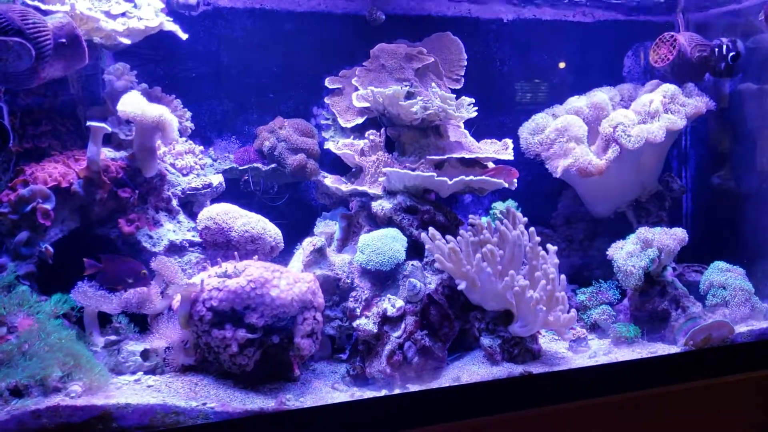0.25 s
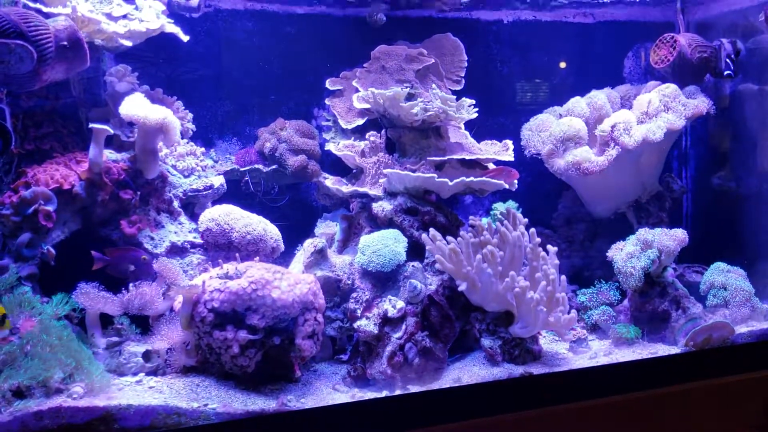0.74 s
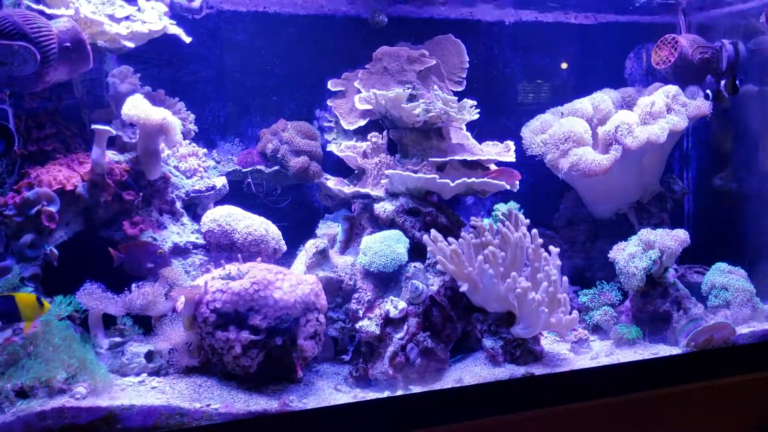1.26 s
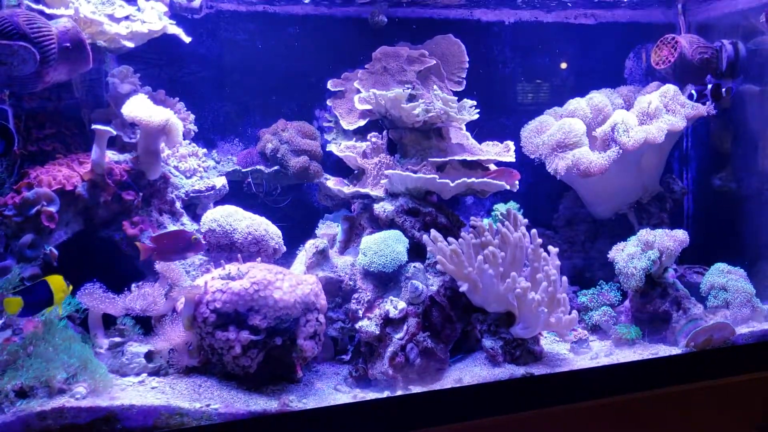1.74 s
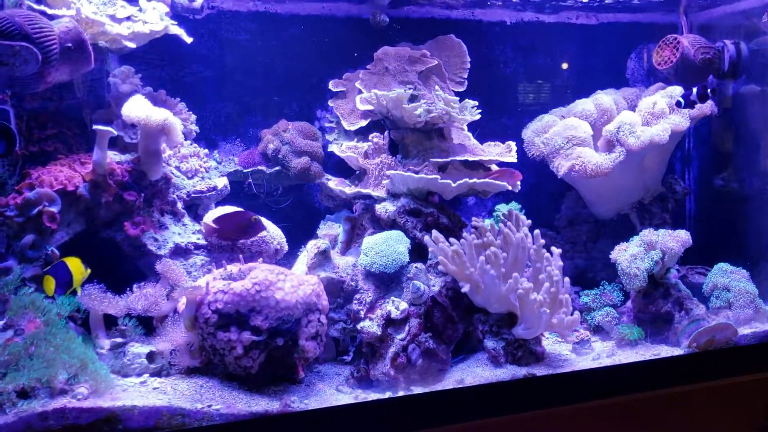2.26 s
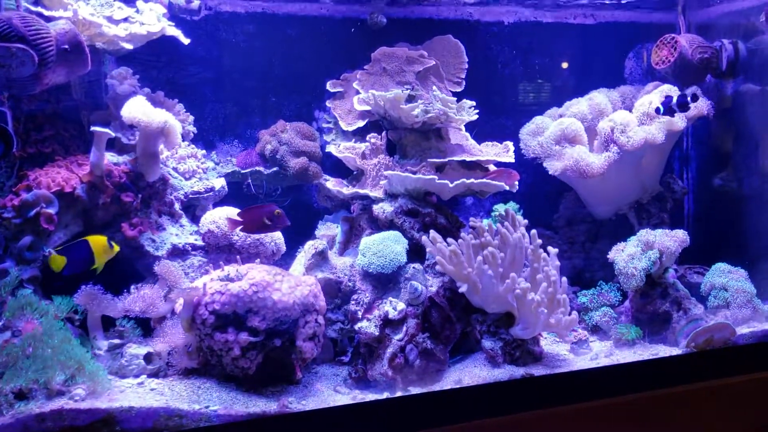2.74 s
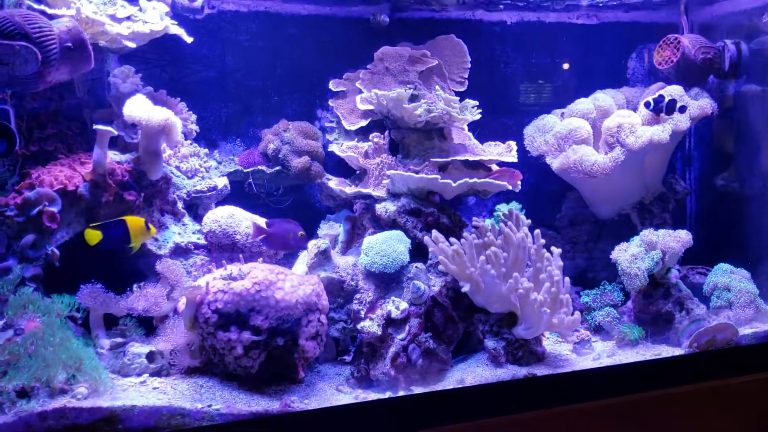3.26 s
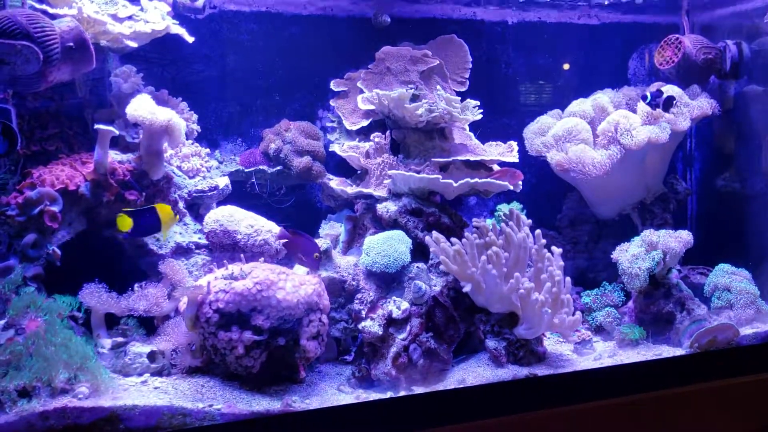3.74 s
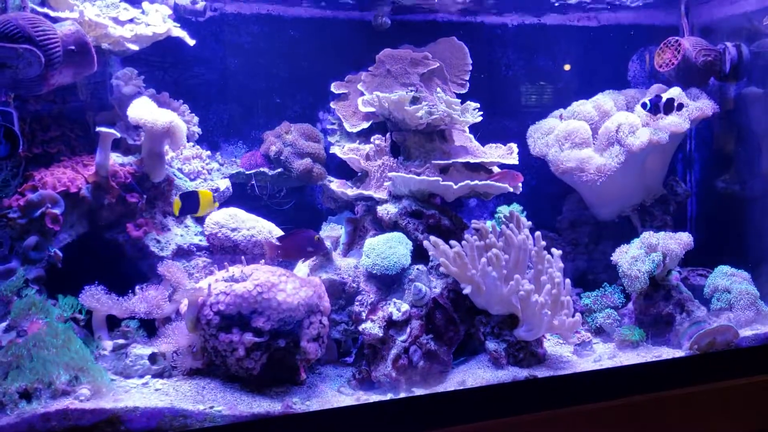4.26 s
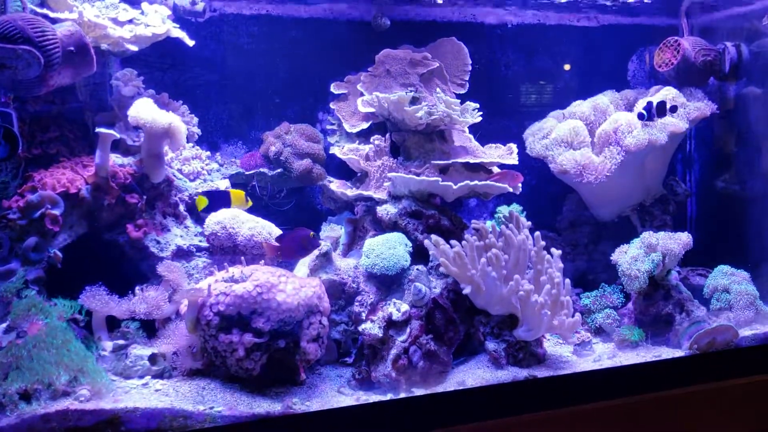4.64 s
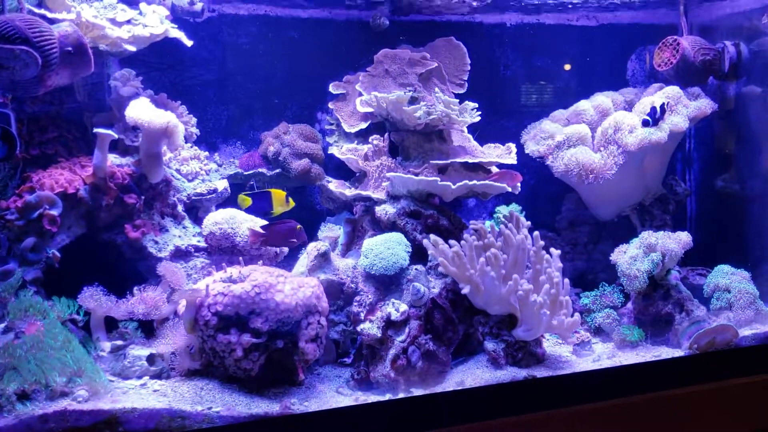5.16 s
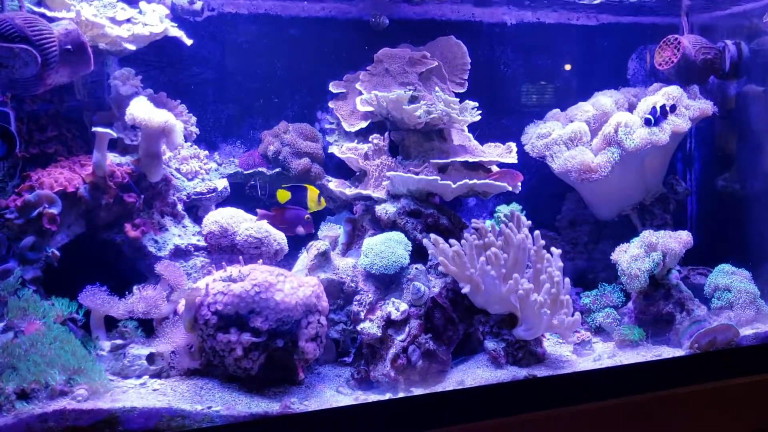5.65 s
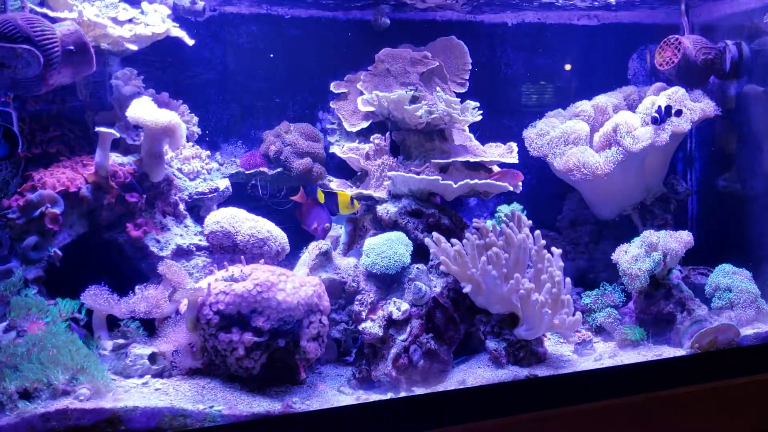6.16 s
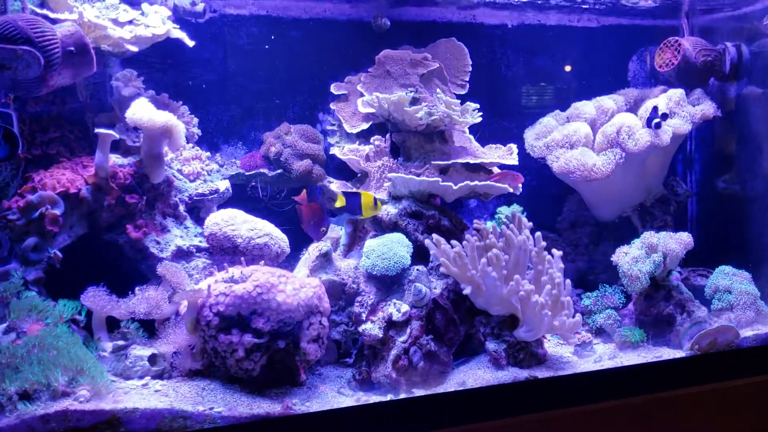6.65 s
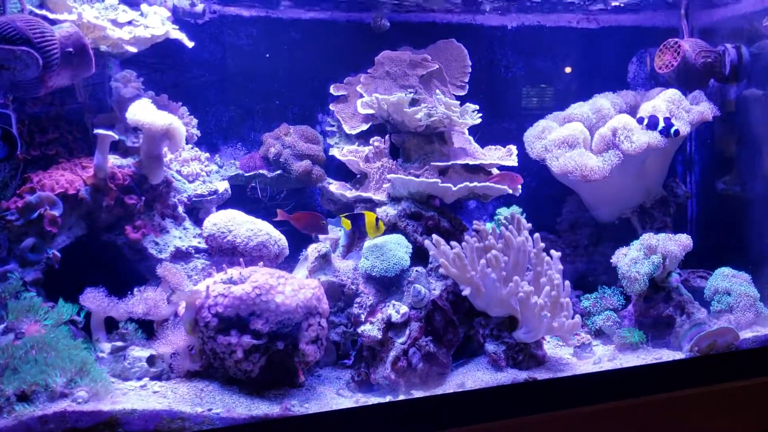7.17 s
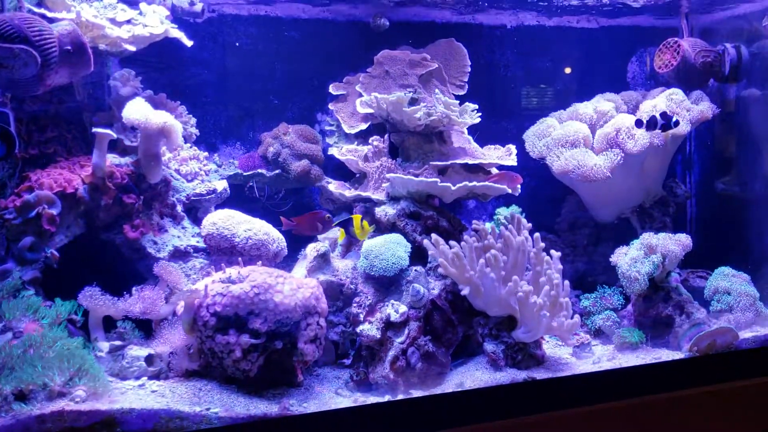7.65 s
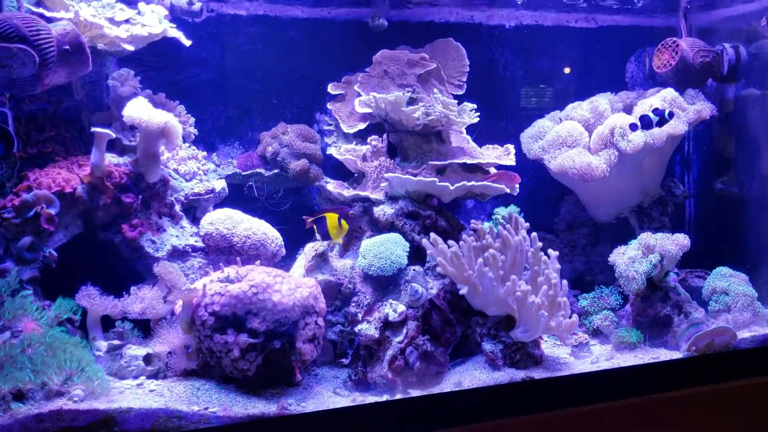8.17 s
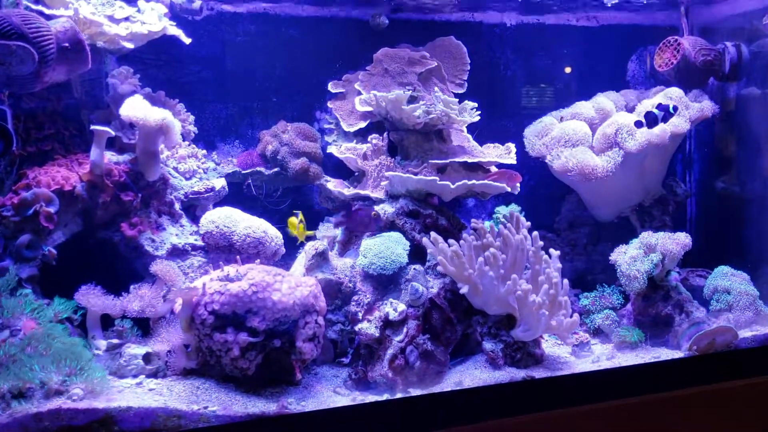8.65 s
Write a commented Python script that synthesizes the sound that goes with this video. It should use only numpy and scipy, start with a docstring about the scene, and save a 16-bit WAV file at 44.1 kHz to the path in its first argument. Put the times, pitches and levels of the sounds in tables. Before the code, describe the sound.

In a quiet room, water runs and fizzes in a fish tank, rising and falling in small regular waves above the constant hum and rumble of circulation pumps. Bubble plops and tiny splashes join within the first second and keep coming. A faint high tone dies away midway, and the hum briefly swells near the end. The sound is in stereo, a little louder on the left.

```python
"""A reef tank in a quiet room, heard by two microphones with the tank to their left.
From the start, pumps hum at multiples of the mains frequency and their churning rumbles in the glass
and cabinet. About every 0.9 s a wave slops water over the overflow, so a hiss full of tiny bubbles swells.
Within the first second, bubble plops, short low notes and small splashes join in and keep coming.
About halfway through, a thin high tone fades almost away. Near the end the hum briefly swells near 900 Hz."""
import sys
import numpy as np
from scipy import signal
from scipy.fft import rfft, irfft
from scipy.io import wavfile
from scipy.ndimage import uniform_filter1d

SR = 44100
rng = np.random.default_rng(int(sys.argv[2]) if len(sys.argv) > 2 else 0)


def inscribe(sig):
    """Save sig as 16-bit PCM at rate SR to the path in sys.argv[1].

    A 1-D sig is mono; a 2-D sig holds one channel per row.
    Samples are clipped to [-1, 1] before scaling.
    """
    pcm = np.round(np.clip(np.atleast_2d(sig).T, -1, 1) * 32767)
    wavfile.write(sys.argv[1], SR, pcm.astype(np.int16))


N = 392578
T = np.arange(N) / SR
HZ = np.maximum(np.arange(N // 2 + 1) * SR / N, 1)   # the frequencies of a spectrum
RIGHT_LAG_S = .00011   # sound reaches the right microphone this much later

# The tone colour of falling water. Each row: frequency in Hz, relative level in dB.
WATER_COLOUR = [(300, -50), (800, -17), (1200, -1.5), (1600, -3.5), (1980, -3.5), (2280, 0), (2700, 0.5),
                (3500, 0.5), (4300, 2), (5400, -1), (6300, 0), (7300, -2.5), (8000, -8.5), (8600, -15.5),
                (11000, -18)]
# How much louder the left side is. Each row: frequency in Hz, left minus right in dB.
LEFT_LOUDER = [(60, 4), (210, 2.5), (770, 4), (1500, 2.5), (3000, .6), (5000, 3), (6100, 3.2), (6900, 11.5),
               (8200, 6.7), (9000, 8), (12000, 3.6), (14000, 11), (15600, 16)]


def amp(db):
    """Turns decibels into a number to multiply by."""
    return 10 ** (np.asarray(db) / 20)


def rms_one(x):
    """Scales a signal so its average strength (rms) is 1."""
    return x / np.sqrt(np.mean(x ** 2) + 1e-20)


def in_time(rows):
    """Joins (seconds, value) points with straight lines, giving one value per sample."""
    return np.interp(T, *np.transpose(rows))


def at_hz(rows, hz):
    """Reads between (Hz, value) points, with every octave equally wide."""
    row_hz, values = np.transpose(rows)
    return np.interp(np.log(hz), np.log(row_hz), values)


def drift(rate):
    """A smooth random wobble, about 1 in size, that changes about rate times a second."""
    r = np.exp(-80 * np.pi * rate / SR)
    slow = signal.lfilter([1], [1, -2 * r, r * r], rng.standard_normal(N // 40 + 2002))[2000:]
    return np.interp(np.arange(N) / 40, np.arange(len(slow)), rms_one(slow))


def resonate(x, hz, width_hz):
    """Makes x ring at one pitch; a smaller width rings longer."""
    r = np.exp(-np.pi * width_hz / SR)
    feedback = [1, -2 * r * np.cos(2 * np.pi * hz / SR), r * r]
    return signal.lfilter([(1 - r * r) / 2, 0, (r * r - 1) / 2], feedback, x)


def flicker(pair, low_hz, top_hz, depth_db, rate):
    """Makes each quarter of an octave waver in level, partly in step with its neighbour."""
    centres = low_hz * 2 ** np.arange(0, np.log2(top_hz / low_hz), 1 / 4)
    spectrum, out, below = rfft(pair), 0, drift(rate)
    for k in range(len(centres)):
        wobble = drift(rate)
        share = np.interp(np.log(HZ), np.log(centres), np.arange(len(centres)) == k)
        out = out + irfft(spectrum * share, N) * amp(depth_db * (wobble + below) / np.sqrt(2))
        below = wobble
    return out


def panned(left, right):
    """Turns two spectra into sound that is louder and earlier on the left."""
    pan = amp(at_hz(LEFT_LOUDER, HZ) / 2)
    delay = np.exp(-2j * np.pi * HZ * RIGHT_LAG_S)
    return irfft(np.array([left * pan, right / pan * delay]), N)


def room(x, fade_s=0.18):
    """Each microphone hears the direct sound plus its own quick echoes, which have little bass."""
    t = np.arange(SR // 2) / SR
    echoes = rng.standard_normal((2, len(t))) * amp(-60 * t / fade_s) * (t > .003)
    echoes /= np.sqrt(np.sum(echoes ** 2, axis=1, keepdims=True))
    echoes = signal.sosfilt(signal.butter(2, 600, "high", fs=SR, output="sos"), echoes)
    echoes[:, 0] = [.7, .5]   # the direct sound, left and right
    return panned(*rfft(signal.fftconvolve(x[None], echoes, axes=1)[:, :N]))


def wave_swell(layer, follows=1):
    """A layer's level in dB rises at each crest and dips at the listed lull times, before or after it."""
    # Each row: crest time in seconds, crest level in dB for wash, for spray and for rumble, lull time
    # in seconds, dB in the lull, dB just after it. All but the crest levels are scaled by follows.
    waves = [(0.0, 2, 2.5, 2.8, 0.29, -1, 0.3), (.89, 2, 3.5, 4.3, 1.26, -4, 0.3),
             (1.72, 1, -1, 1.4, 2.3, -2, 0.1), (2.69, 2.5, 3, 2.5, 2.97, -2.5, 1.5),
             (3.6, 3, 5, 5.2, 3.44, -1.5, 0.6), (4.5, 2, -0.6, 1.9, 5.3, -1.5, 1.3),
             (5.37, 3.5, 4, 3.8, 5.6, -2, 0.6), (6.39, 1.8, 3, 1.9, 6.69, -3, 0.5),
             (7.19, 2, 1, 3.5, 7.52, -3, 0.5), (8.09, 2.5, 4, 1.5, 9.9, 0, -1.5),
             (8.97, 0.4, -1.5, 1.5, 8.7, -1.5, -1)]
    rise_s, fall_s, sink_s, recover_s = 0.085, 0.1, .12, 0.14
    ebb_db, sag_db = -0.2, 0.1
    next_crests = [wave[0] for wave in waves[1:]] + [waves[-1][0] + 1]
    points = []
    for (crest, *crest_db, lull, lull_db, after_lull_db), next_crest in zip(waves, next_crests):
        ebb = crest + fall_s
        points += [(crest, crest_db[["wash", "spray", "rumble"].index(layer)]),
                   (ebb, follows * ebb_db),
                   (max(lull - sink_s, ebb), follows * ebb_db),
                   (lull, follows * lull_db),
                   (lull + recover_s, follows * after_lull_db),
                   (next_crest - rise_s, follows * (after_lull_db - sag_db))]
    return in_time(sorted(points))


def pumps(mains_hz=60.0):
    """Magnets pull in time with the mains and make a wavering hum; the spinning rotors add a whine."""
    # Each row: multiple of the mains frequency, left level in dB, right level in dB.
    hum_tones = [(1, -72, -81), (2, -39.5, -44), (3, -68, -78), (4, -55, -56.5), (5, -60.5, -62.5),
                 (6, -66, -71.5), (7, -66.5, -65.5), (8, -71, -80), (9, -77.5, -79), (13, -83, -89),
                 (14, -76, -93), (15, -67, -85), (16, -72, -96), (17, -79, -79)]
    # Each row: pitch in Hz, width in Hz, left level in dB, right level in dB.
    rotor_tones = [(138.5, 1.5, -65, -68), (1138, 4.0, -81, -75), (1388, 2.0, -82, -87),
                   (1845, 4.0, -82, -84)]
    out = np.zeros((2, N))
    heard_s = T - np.array([[0], [RIGHT_LAG_S]])
    for multiple, left_db, right_db in hum_tones:
        hum = np.sqrt(2) * np.sin(2 * np.pi * (multiple * mains_hz * heard_s + rng.random()))
        out += hum * amp(np.array([[left_db], [right_db]]) + 0.32 * drift(2.5))
    for hz, width_hz, left_db, right_db in rotor_tones:
        noise = rng.standard_normal(N + SR)   # a spare second lets the ringing build up
        whine = resonate(resonate(noise, hz, width_hz), hz, width_hz)[SR:]
        out += rms_one(whine) * amp([[left_db], [right_db]])
    return out


def thin_tone(hz=1368.6, right_db=-8.0):
    """A faint pure tone that fades about halfway through."""
    # Each row: time in seconds, left level in dB.
    levels = [(0, -71.5), (4.5, -70), (4.9, -84), (8.9, -88)]
    return np.sqrt(2) * np.sin(2 * np.pi * hz * T) * amp(in_time(levels) + np.array([[0], [right_db]]))


def rumble():
    """Water churned by the pumps makes the glass and cabinet ring, louder with each wave."""
    # Where glass and cabinet ring. Each row: pitch in Hz, width in Hz, boost in dB.
    resonances = [(134, 55, 5), (178, 31, 3.5), (248, 37, 6.5), (292.6, 13, 6), (374.5, 12, 12),
                  (411, 29, 3), (497.5, 28, 7.5), (662.5, 39, 11), (880, 35, 2.5), (964, 28, 7.5),
                  (1140, 50, 1.5), (1826, 55, 13), (2193, 110, 17)]
    # The tone colour of the churning. Each row: frequency in Hz, relative level in dB.
    churn_colour = [(20, -32), (40, -15), (60, -5), (110, -4), (200, -7.5), (400, -9.5), (750, -15.5),
                    (1100, -15.5), (1600, -27), (3000, -35)]
    # How alike left and right are between resonances. Each row: frequency in Hz, likeness from 0 to 1.
    likeness = [(30, .9), (75, .97), (160, .94), (270, .84), (450, .7), (740, .5), (1300, .1)]
    level_db = -50 + wave_swell("rumble", follows=0.77) + 0.67 * drift(4.8)
    boost_db = sum(db / (1 + (2 * (HZ - hz) / width_hz) ** 2) for hz, width_hz, db in resonances)
    alike = at_hz(likeness, HZ)
    common, apart = rfft(rng.standard_normal((2, N))) * amp(at_hz(churn_colour, HZ))
    common = np.sqrt(1 + alike) * common * amp(boost_db)
    apart = np.sqrt(1 - alike) * apart * amp(0.44 * boost_db)
    noise = rms_one(panned(common + apart, common - apart))
    return amp(level_db) * flicker(noise, 62.4, 2500, depth_db=1.6, rate=11.0)


def water_hiss(colour, low_hz, top_hz, flicker_db, crackle_db):
    """Falling water hisses differently at each microphone and flickers as bubble sizes come and go."""
    # The room's resonances leave small ripples in the tone colour.
    ripple_db = 1.5 * rms_one(uniform_filter1d(rng.standard_normal((2, len(HZ))), size=200))
    spectra = rfft(rng.standard_normal((2, N))) * amp(at_hz(colour, HZ) + ripple_db)
    hiss = flicker(rms_one(panned(*spectra)), low_hz, top_hz, flicker_db, rate=10.6)
    return hiss * amp(crackle_db * drift(45.0))


def wash():
    """Water pours along the whole overflow, swelling with each wave."""
    level_db = -54 + wave_swell("wash")
    return amp(level_db) * water_hiss(WATER_COLOUR, 1280, 9500, flicker_db=0.63, crackle_db=0.3)


def spray():
    """Spray adds a higher hiss that rises and falls more than the wash."""
    # Each row: frequency in Hz, relative level in dB.
    spray_colour = [(2000, -60), (6000, -16), (8300, -11), (10000, -2), (11300, 2), (12300, 4.5),
                    (14500, 1), (16000, -3.5)]
    level_db = -52 + wave_swell("spray", follows=1.45) + 0.52 * drift(15.0)
    return amp(level_db) * water_hiss(spray_colour, 7800, 16000, flicker_db=1.5, crackle_db=0.74)


def trickle(bubbles_per_s=140.0, sharpness=25.6):
    """Tiny bubbles appear at random, and each rings briefly at one of 24 pitches."""
    sizes = amp(3.6 * np.minimum(rng.exponential(1, N), 3))
    kicks = sizes * (rng.random(N) < bubbles_per_s / SR)
    which_pitch = rng.integers(0, 24, N)
    pitches = np.geomspace(1100, 8000, 24) * amp(rng.uniform(-0.25, 0.37))   # all shifted a little
    rings = sum(resonate(kicks * (which_pitch == k) + 1e-18, hz, hz / sharpness)
                for k, hz in enumerate(pitches))
    bubbles = rms_one(irfft(rfft(rings) * amp(at_hz(WATER_COLOUR, HZ)), N))
    return bubbles * amp(-63.5 + wave_swell("wash"))


def plops_and_low_notes():
    """Short rising notes: bubble plops, and low swells at the pitches where glass and cabinet ring."""
    # Each row: start in seconds, level in dB before the room, starting pitch in Hz,
    # seconds to fade by 60 dB.
    notes = [(.285, -44, 1177, .08), (.33, -52, 1170, .05), (.35, -46, 3550, .04), (.45, -42.5, 639, .15),
             (.865, -40, 358, .16), (1.145, -50, 1444, .06), (1.465, -37, 257, .12), (2.1, -46, 663, 0.11),
             (2.72, -45, 650, .12), (3.13, -43, 2960, .04), (3.174, -45, 1500, .05),
             (3.187, -53, 1540, .04), (3.5, -42, 495, .14), (3.53, -48, 1050, .08), (3.63, -36, 286, 0.14),
             (4.112, -39, 2260, .03), (4.122, -48, 2380, .03), (4.298, -46, 2290, .06),
             (4.4425, -25.5, 6300, 0.0087), (5.32, -40.5, 420, 0.12), (5.38, -47, 943, .08),
             (6.5, -51, 2200, .06), (6.63, -47, 2320, .06), (7.257, -47, 2020, .05),
             (7.418, -48, 2270, .045), (7.43, -49, 2230, .04), (7.625, -47, 3020, .05),
             (8.05, -48, 640, .18), (8.72, -48, 650, .13)]
    out = np.zeros(N)
    t = np.arange(SR // 8) / SR
    fade_in = 1 - np.exp(-t / 0.0006)
    for start_s, level_db, hz, fade_s in notes:
        ring = np.sin(2 * np.pi * hz * t * (1 + 1.44 * t)) * fade_in * amp(level_db - 60 * t / fade_s)
        start = int(start_s * SR)
        out[start:start + len(t)] += ring[:N - start]
    return out


def splashes_and_hum_swell(rise_s=0.0078, lead_in_s=.2):
    """Bursts of noise: splashes of tiny bubbles, and one brief swell in the pump hum near 900 Hz."""
    # Each row: loudest moment in seconds, level then in dB (midway between left and right),
    # centre pitch in Hz, pitch spread in Hz, seconds to fade by 60 dB. The hum swell is at 8.25 s.
    bursts = [(.57, -53, 4170, 700, .3), (.8, -54, 6300, 1000, .15), (.9, -57, 6530, 1500, .17),
              (1.43, -53, 13500, 3000, .3), (1.71, -54, 4300, 2000, 0.44), (2.1, -55, 13000, 3500, .2),
              (1.96, -56, 4300, 1500, .4), (2.05, -54, 6800, 1200, .15), (2.12, -53, 4200, 900, .2),
              (2.52, -54, 6700, 1200, .16), (2.665, -46, 12600, 4000, .42), (2.668, -45, 5940, 1000, .18),
              (3.19, -58, 4000, 2500, .4), (3.219, -51, 5800, 1000, .3), (3.542, -48.5, 7140, 900, .17),
              (3.59, -49, 6200, 1700, .39), (3.595, -53, 13500, 3500, .35), (3.6, -57, 3500, 1500, .3),
              (4.115, -52.5, 2700, 1200, .6), (4.18, -55, 4270, 900, .6), (4.28, -56, 4200, 1500, .5),
              (4.328, -45, 12600, 1500, .12), (4.436, -45, 6560, 1400, 0.23), (4.57, -51, 4300, 1800, .25),
              (4.825, -49, 13400, 2500, .12), (5.371, -47, 6200, 1300, .23),
              (5.372, -49.5, 13200, 2000, 0.18), (6.221, -45, 6200, 1500, 0.23),
              (5.09, -57, 6500, 1500, .2), (5.98, -56, 12000, 4000, .6), (6.12, -57, 12500, 4000, .7),
              (6.4, -58.5, 2300, 400, .9), (6.55, -60, 2320, 300, .6), (6.757, -50.5, 5200, 1500, .12),
              (6.793, -48, 12500, 2500, .12), (7.02, -52, 14500, 2500, .12), (7.165, -48, 13000, 2500, .13),
              (7.192, -52, 7000, 1200, .13), (7.225, -51, 14300, 2500, .15), (7.63, -52, 11500, 2500, 0.16),
              (8.07, -53, 6050, 2200, .25), (8.075, -54, 3800, 1800, .35), (8.25, -60, 925, 120, .95),
              (8.108, -56, 14000, 3000, .12), (8.185, -56, 14500, 2500, .12), (8.55, -50, 13000, 3000, .12),
              (8.85, -50, 5270, 1800, .25)]
    out = np.zeros((2, N))
    for peak_s, peak_db, hz, width_hz, fade_s in bursts:
        start = int((peak_s - lead_in_s) * SR)
        t = np.arange(min(SR, N - start)) / SR - lead_in_s
        noise = rng.standard_normal((2, SR))[:, :len(t)]
        burst = rms_one(resonate(resonate(noise, hz, width_hz), hz, width_hz))
        shape = np.where(t < 0, np.exp(np.minimum(t, 0) / rise_s), amp(-60 * t / fade_s))
        sides_db = at_hz(LEFT_LOUDER, hz) * np.array([[.5], [-.5]])
        out[:, start:start + len(t)] += burst * shape * amp(peak_db + sides_db)
    return out


def scene():
    """Adds up water, tank and pumps; the trickle runs at three places, each with its own echoes."""
    overflow = wash() + spray() + sum(room(trickle()) for _ in range(3))
    background = overflow + rumble() + pumps() + thin_tone()
    return background + splashes_and_hum_swell() + room(plops_and_low_notes())


def record(dry):
    """Steeply cuts away the very highest treble."""
    cutoff_hz = 15770
    return signal.sosfilt(signal.ellip(14, .5, 70, cutoff_hz, fs=SR, output="sos"), dry)


dry = scene()
out = record(dry)
inscribe(out)
```